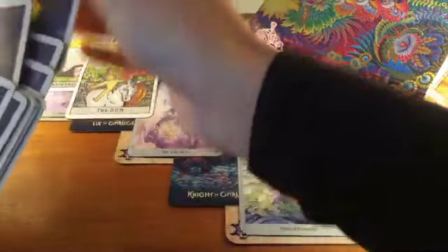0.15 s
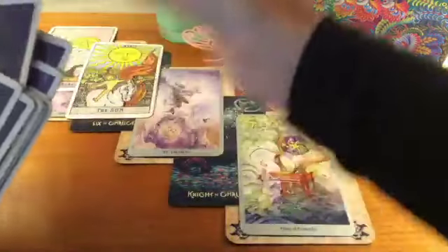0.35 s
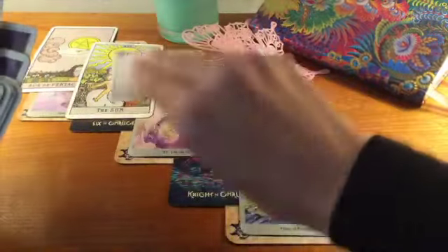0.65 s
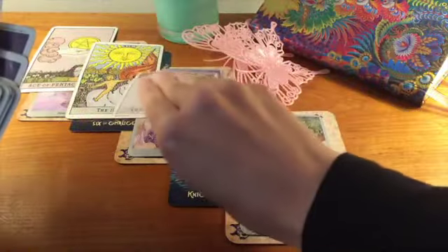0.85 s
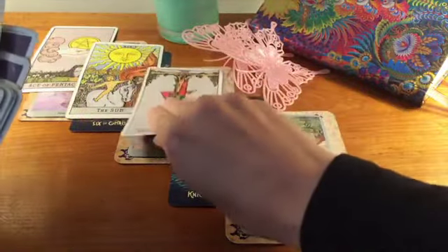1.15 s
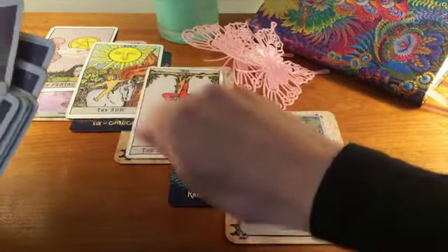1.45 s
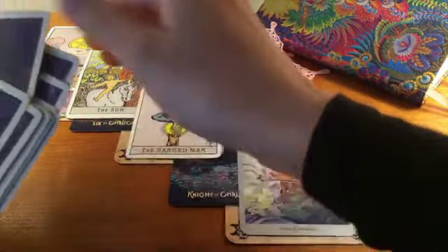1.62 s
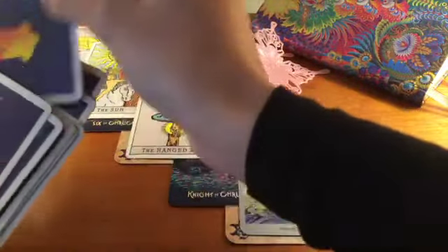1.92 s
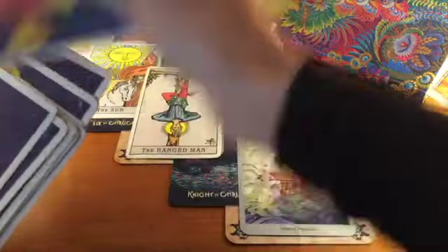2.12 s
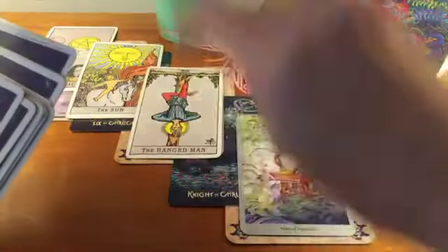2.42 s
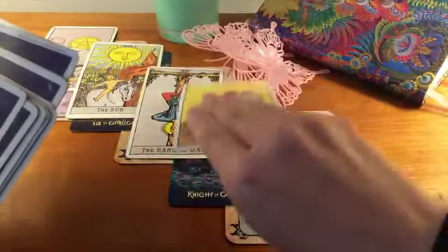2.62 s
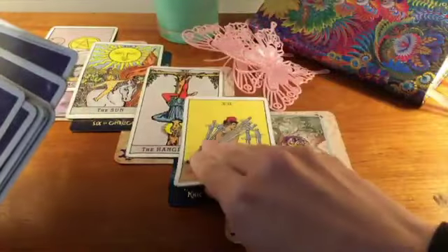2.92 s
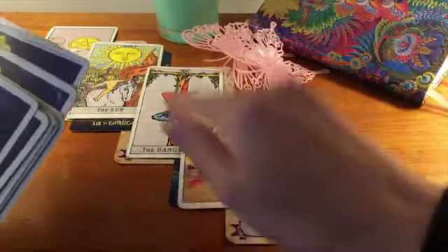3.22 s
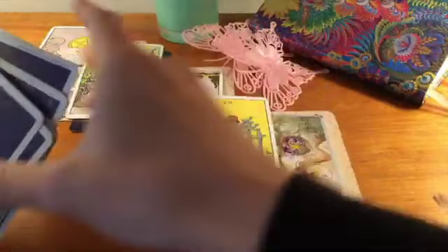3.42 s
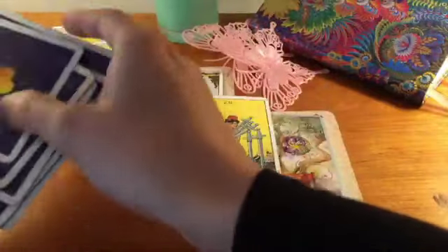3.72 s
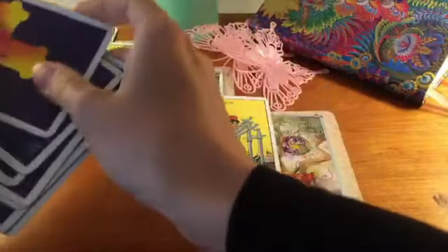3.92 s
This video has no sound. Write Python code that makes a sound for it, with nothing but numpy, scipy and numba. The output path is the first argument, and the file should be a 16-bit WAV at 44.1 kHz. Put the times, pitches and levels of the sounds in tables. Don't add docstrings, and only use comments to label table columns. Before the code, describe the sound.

Stiff cards rub, tick and snap sharply off a deck onto a wooden table in a quiet room with low rumble and hiss.

```python
import sys
import numpy as np
from scipy import signal
from scipy.io import wavfile
from numba import njit

SR = 44100
rng = np.random.default_rng(int(sys.argv[2]) if len(sys.argv) > 2 else 0)


def put_to_file(sound):
    columns = np.atleast_2d(sound).T
    safe = np.clip(columns, -1, 1)
    whole_steps = np.round(safe * 32767)
    wavfile.write(sys.argv[1], SR, whole_steps.astype(np.int16))


def gain_from_db(level_db):
    decades = np.asarray(level_db, float) / 20
    return 10 ** decades


N = 178825


def rms_one(x):
    return x / np.sqrt(np.mean(x ** 2) + 1e-20)


def band(x, low_hz, high_hz):
    edges_hz = [low_hz, min(high_hz, 0.45 * SR)]
    return signal.sosfilt(signal.butter(2, edges_hz, "band", fs=SR, output="sos"), x)


def resonance(x, hz, width_hz):
    r = np.exp(-np.pi * width_hz / SR)
    push = np.array([1, 0, -1]) * (1 - r * r) / 2
    return signal.lfilter(push, [1, -2 * r * np.cos(2 * np.pi * hz / SR), r * r], x)


@njit
def gliding_resonance(x, hz, r, sr):
    out = np.zeros(len(x))
    for i in range(2, len(x)):
        turn = 2 * r * np.cos(2 * np.pi * hz[i] / sr)
        out[i] = x[i] - x[i - 2] + turn * out[i - 1] - r * r * out[i - 2]
    return out


def ring(clicks, hz, t60):
    r = gain_from_db(-60 / (t60 * SR))
    w = 2 * np.pi * hz / SR
    return signal.lfilter([0, np.sin(w)], [1, -2 * r * np.cos(w), r * r], clicks + 1e-18)


def drift(rate_hz):
    r = np.exp(-2 * np.pi * rate_hz / SR)
    slow = signal.lfilter([1], [1, -2 * r, r * r], rng.standard_normal(N + SR))
    return rms_one(slow[SR:])


# pitch in Hz, level in dB per Hz.
HISS_COLOUR = [(180, -20.5), (242, -15), (476, -22.5), (1130, -28.5), (2280, -30.5), (6560, -33),
               (14400, -35), (16000, -51)]


def room_tone(level_db=-66.5):
    edges_hz = 180 * 2 ** np.arange(0, 7, 0.5)
    white = rng.standard_normal((2, N))
    hz, colour_db = np.transpose(HISS_COLOUR)
    out = np.zeros(N)
    for k, (low, high) in enumerate(zip(edges_hz, edges_hz[1:])):
        band_db = np.interp(np.log(low * high) / 2, np.log(hz), colour_db)
        out += gain_from_db(band_db) * band(white[k % 2], low, high)
    return gain_from_db(level_db) * rms_one(out)


# time in seconds, level of the rumble in dB.
RUMBLE = [(0.0, -59.7), (0.15, -59.5), (0.3, -67.5), (0.55, -59), (0.8, -60.5), (1.05, -60), (1.25, -59.5),
          (1.45, -58), (1.7, -64.5), (1.95, -64), (2.15, -59.5), (2.45, -60.5), (2.7, -60.5), (2.95, -60.5),
          (3.15, -69), (3.4, -64.3), (3.75, -56.5), (4.05, -64.5)]


def hum(wander_db=1.53, wander_hz=2.6, lean_s=3.67, lean_half_s=0.26):
    now = np.arange(N) / SR
    noise = rng.standard_normal((3, N + SR))
    level_db = np.interp(now, *np.transpose(RUMBLE))
    lean = np.exp(-((now - lean_s) / lean_half_s) ** 4)
    low_db = level_db - 6 + 5 * lean + wander_db * drift(wander_hz)
    upper_db = level_db - 3.5 - 7 * lean + wander_db * drift(wander_hz)
    low = rms_one(resonance(resonance(noise[0], 59.7, 28), 59.7, 28)[SR:])
    upper = rms_one(resonance(resonance(noise[1], 143.2, 32.7), 144.7, 34)[SR:])
    upper = upper + 0.73 * rms_one(band(noise[2], 91.5, 142)[SR:])
    deepest = rms_one(band(noise[2], 25, 50)[:N])
    return gain_from_db(low_db) * low + gain_from_db(upper_db + 4) * upper + gain_from_db(-78) * deepest


def room(x, t60_s=0.31, wall_cut_hz=3700):
    out = np.zeros(N)
    dull = np.exp(-2 * np.pi * wall_cut_hz / SR)
    lags = (rng.uniform(0.0067, 0.031, size=10) * SR).astype(int)
    for k, lag in enumerate(lags):
        loop, state = x.copy(), [0.]
        gain = gain_from_db(-60 * lag / SR / t60_s)
        for i in range(lag, N, lag):
            back, state = signal.lfilter([gain * (1 - dull)], [1, -dull], loop[i - lag:i], zi=state)
            loop[i:i + lag] += back[:N - i]
        out += (loop - x) * (-1) ** k
    return out


# pitch in Hz, level in dB, time to fall 60 dB in seconds.
TABLE_MODES = [(68, -5, 0.2), (155, 2.5, 0.065), (206, -7.5, 0.073), (301, -6.5, 0.069), (383, 2.5, 0.041),
               (552, -7, 0.038), (956, -9, 0.06)]
# time in seconds, peak in dB, weight of the hand in dB,
# spot on the table from 0 (rim) to 1 (middle).
TABLE_BLOWS = [(0.185, -45.5, -20, 0.44), (0.331, -53.5, -15, 0.05), (0.461, -38.5, -32, 1),
               (0.468, -39.5, -23, 0.09), (1.543, -38.5, -26, 0.97), (2.171, -38.5, -35, 0.54),
               (2.275, -33, -11, 0.03), (2.285, -27.5, -1, 0.067), (2.319, -32.5, -19, 0.53),
               (2.584, -47, -18.5, 0.86), (2.808, -47.5, 0, 0.75), (2.925, -48.5, -6, 0.56),
               (3.226, -55, -18, 0.98), (3.23, -37.5, -33, 0.95), (3.669, -49, 7.5, 1)]


def thuds(push_hz=1500):
    s, peak_db, weight_db, spot = np.transpose(TABLE_BLOWS)
    shares = gain_from_db(weight_db), np.clip(spot, 0.01, 0.99), np.clip(1 - spot, 0.01, 0.99)
    out = np.zeros(N)
    for hz, level_db, t60 in TABLE_MODES:
        blows = np.zeros(N)
        share = shares[np.searchsorted([100, 250], hz)]
        blows[np.round(s * SR).astype(int)] = gain_from_db(peak_db + level_db) * share
        out += ring(blows, hz, t60)
    return signal.sosfilt(signal.butter(2, push_hz, fs=SR, output="sos"), out)


# time in seconds, peak in dB, ring in Hz, crack in dB,
# time for the crack to fall 60 dB in seconds.
EDGE_SNAPS = [(1.545, -18, 1640, -4.5, 0.0041), (2.171, -26, 1370, -20, 0.0052),
              (2.174, -30.5, 1920, -21.5, 0.034), (2.268, -11.5, 2530, -29, 0.019),
              (2.2767, -8, 1850, -13, 0.022), (2.281, -16.5, 1370, -18, 0.0065),
              (2.286, -14, 1180, -18, 0.017), (2.3198, -25, 935, -7.5, 0.015),
              (2.808, -27, 2320, -15.5, 0.016), (2.813, -35.5, 1170, -12, 0.017),
              (2.926, -34, 1520, -8.5, 0.017), (3.224, -22, 1860, -11.5, 0.024),
              (3.229, -38, 1260, -7, 0.016)]
# time in seconds, peak in dB, ring in Hz, crack in dB.
NAIL_TAPS = [(0.253, -50.5, 1140, -5.5), (0.331, -50, 960, -8), (0.382, -52, 3550, -17),
             (0.405, -26, 3572, -20), (0.625, -33.5, 1940, -26), (0.962, -39.5, 1350, -12.5),
             (1.001, -40, 1490, -14.5), (1.107, -46.5, 1390, -15), (1.817, -47, 1360, -18),
             (1.899, -44, 1160, -15), (2.091, -45, 1400, -22), (2.354, -40, 1300, -17),
             (2.949, -40.5, 2071, -24), (2.982, -48, 2200, -12), (3.583, -47, 2590, -9.5),
             (3.668, -41, 1180, -27), (3.683, -37, 3240, -24)]
CRACK_BORDERS = [3200, 7500, 14000]


def snaps(cycles=1.07, ring_db=-4, crest_db=10, late_s=0.0006, tap_t60_s=0.021):
    # level of the thin edge below the crack, in dB
    hits = [(*row, -11.5) for row in EDGE_SNAPS]
    hits += [(*row, tap_t60_s, -6) for row in NAIL_TAPS]
    size = SR // 10
    age = np.arange(size) / SR
    out = np.zeros(N)
    for s, peak_db, hz, crack_db, t60, edge_db in hits:
        burst = 0.23 * rng.standard_normal(size) * gain_from_db(-60 * age / max(t60, 0.002))
        burst[0] = 2.12
        flap = resonance(resonance(burst, hz, hz / cycles), hz, hz)
        crack = band(burst, *CRACK_BORDERS[:2])
        edge = -band(burst, *CRACK_BORDERS[1:])
        snap = gain_from_db(ring_db) * flap / np.abs(flap).max()
        snap = snap + gain_from_db(crack_db + crest_db) * crack / np.abs(crack).max()
        snap = snap + gain_from_db(crack_db + edge_db + crest_db) * edge / np.abs(edge).max()
        at = round((s + late_s) * SR)
        out[at:at + size] += gain_from_db(peak_db) * snap[:N - at]
    return out


# release in seconds,
# length in seconds, level in dB, pressure in dB, flap pitch in Hz.
CARD_PULLS = [(0.424, 0.016, -43, -2, 3500), (0.452, 0.028, -38.5, 1, 4400),
              (0.473, 0.075, -35.5, 1.5, 2300), (0.473, 0.045, -48, 18, 2300),
              (1.533, 0.037, -44, 3.5, 1650), (1.541, 0.016, -37, -3, 3650), (2.169, 0.072, -54, 1, 2900),
              (2.268, 0.078, -36.5, 2.5, 2850), (2.29, 0.02, -29.5, 3.5, 1900),
              (2.317, 0.022, -47, 3, 2580), (3.227, 0.022, -43, -1.5, 1800), (3.24, 0.014, -49, 1, 1800)]
# loudest moment in seconds, half width in seconds,
# level in dB, pressure in dB, flap pitch in Hz.
FINGER_RUBS = [(-0.004, 0.014, -68.2, 7.4, 2890), (0.143, 0.084, -61.5, -3.5, 2870),
               (0.174, 0.033, -48.8, -3.0, 2900), (0.354, 0.014, -62.5, 0.4, 3030),
               (0.388, 0.013, -52.5, 1.5, 3500), (0.599, 0.087, -68.4, -6.3, 2800),
               (0.854, 0.035, -79.4, -11.3, 3180), (0.991, 0.05, -66.6, -1.7, 2860),
               (1.464, 0.052, -63.6, 5.8, 1800), (1.832, 0.017, -58.8, -1.2, 2850),
               (1.87, 0.035, -65.1, -0.6, 2860), (1.97, 0.043, -61.4, -1.1, 3150),
               (2.028, 0.035, -52.0, -3.1, 3140), (2.103, 0.017, -60.8, -1.0, 2960),
               (2.827, 0.02, -62.3, 3.4, 2600), (2.966, 0.107, -68.4, 2.4, 2610),
               (3.174, 0.066, -58.7, 2.5, 1800), (3.485, 0.068, -74.3, -8.4, 2900),
               (3.611, 0.033, -69.0, -6.7, 3200), (3.675, 0.03, -59.6, -2.4, 3140),
               (3.766, 0.044, -56.7, -1.0, 3500), (3.886, 0.052, -70.4, -6.0, 3400),
               (3.946, 0.039, -69.1, -6.2, 3310), (4.026, 0.031, -58.8, -2.1, 3500)]
# offset in dB, share of the pressure (a factor),
# steepness of the swell (a factor), idle handling in dB.
CARD_PARTS = [
    (-7.5, 0.96, 1.53, -70),
    (-9, 0.84, 1.01, -81),
    (-2, -0.015, 1.08, -81),
    (-1.5, -1.17, 0.85, -87),
]


def pull_shape_db(after, length, steep, pressed_db):
    growth, let_go_db_per_s = 1.15, 2198
    settle_db, settle_db_per_s = -19.5, 117
    rise_db = 20 * growth * np.log10(np.clip(1 + after / length, 1e-4, 1)) * steep
    settling_db = settle_db - settle_db_per_s * after - pressed_db
    fall_db = np.maximum(-let_go_db_per_s * after, settling_db)
    return np.where(after < 0, rise_db, fall_db)


def rub_shape_db(after, half_width, steep):
    return -9.5 * np.abs(after / half_width) ** 1.76 * steep


def strokes():
    now = np.arange(N) / SR
    power = np.zeros((4, N))
    pitch_weight, pitch_sum = np.full(N, 1e-12), np.full(N, 3000e-12)
    offset_db, share, steep, idle_db = np.transpose(CARD_PARTS)[:, :, None]
    for pulled, rows in (True, CARD_PULLS), (False, FINGER_RUBS):
        for s, length, level_db, press_db, hz in rows:
            at = slice(max(int((s - 0.2) * SR), 0), int((s + 0.5) * SR))
            after = now[at] - s
            pressed_db = share * press_db
            if pulled:
                shape_db = pull_shape_db(after, length, steep, pressed_db)
            else:
                shape_db = rub_shape_db(after, length, steep)
            part = gain_from_db(2 * (level_db + offset_db + pressed_db + shape_db))
            power[:, at] += part
            pitch_weight[at] += part[2]
            pitch_sum[at] += part[2] * hz
    return 10 * np.log10(power + gain_from_db(2 * idle_db)), pitch_sum / pitch_weight


# pitch in Hz, width in Hz, level in dB.
CARD_MODES = [(370, 240, -5.5), (910, 880, -2), (1350, 297, 2), (1810, 424, -6), (2590, 1250, -7.5),
              (4700, 2180, -3.5), (6700, 2140, -3), (8750, 4450, -6.5)]
PART_TOPS = [700, 2000, 5000]


def scrape(catches_per_s=12000, spread_db=2.5, judder_db=3.5, flap_width_hz=400, flap_db=-4):
    parts_db, flap_hz = strokes()
    scrape_db, hiss_db = parts_db[2:]
    sizes = gain_from_db(spread_db * np.minimum(rng.exponential(1, N), 3)) * rng.choice([-1, 1], N)
    catches = (rng.random(N) < catches_per_s / SR) * sizes
    judder = drift(53)
    flap = gliding_resonance(catches, flap_hz, np.exp(-np.pi * flap_width_hz / SR), SR)
    out = gain_from_db(scrape_db + flap_db + judder_db * drift(39.5)) * rms_one(flap)
    for k, (hz, width_hz, level_db) in enumerate(CARD_MODES):
        stroke_db = parts_db[np.searchsorted(PART_TOPS, hz)] + level_db
        flicker_db = judder_db * (0.71 * judder + 0.1 * drift(29.1))
        mode = rms_one(resonance(resonance(catches, hz, width_hz), hz, 4 * width_hz))
        out = out + (-1) ** k * gain_from_db(stroke_db + flicker_db) * mode
    edge_hiss = rms_one(band(catches, 9560, 15800))
    return out + gain_from_db(hiss_db + 0.38 * judder_db * judder - 6.5) * edge_hiss


def scene():
    cards = scrape() + snaps()
    echoes = gain_from_db(-24) * room(cards)
    return (cards + thuds() + echoes + hum() + room_tone())[None]


def low_pass(x):
    return signal.sosfilt(signal.butter(12, 16390, fs=SR, output="sos"), x)


def record(dry):
    no_bass = signal.sosfilt(signal.butter(3, 42, "high", fs=SR, output="sos"), dry)
    no_top = signal.sosfilt(signal.cheby2(12, 30, 15650, fs=SR, output="sos"), no_bass)
    return low_pass(no_top)


dry = scene()
out = record(dry)
put_to_file(out)
```